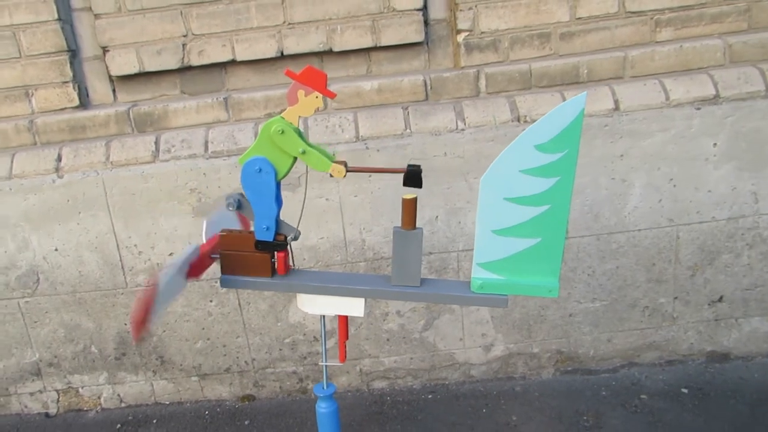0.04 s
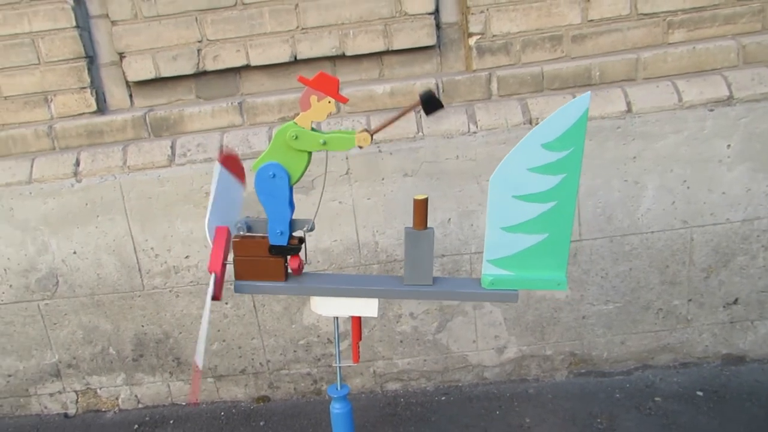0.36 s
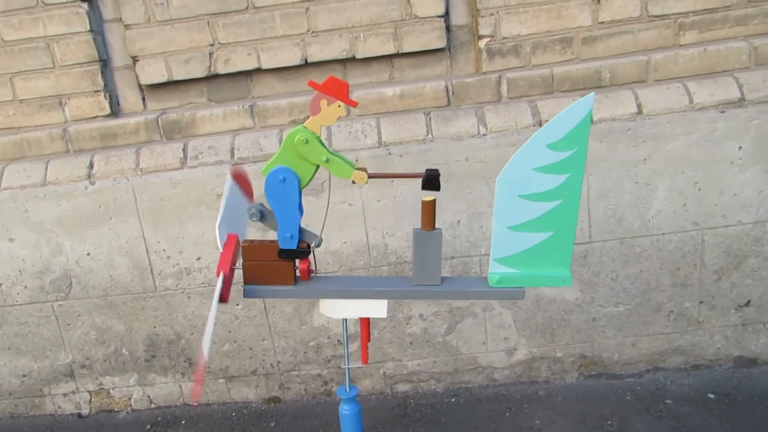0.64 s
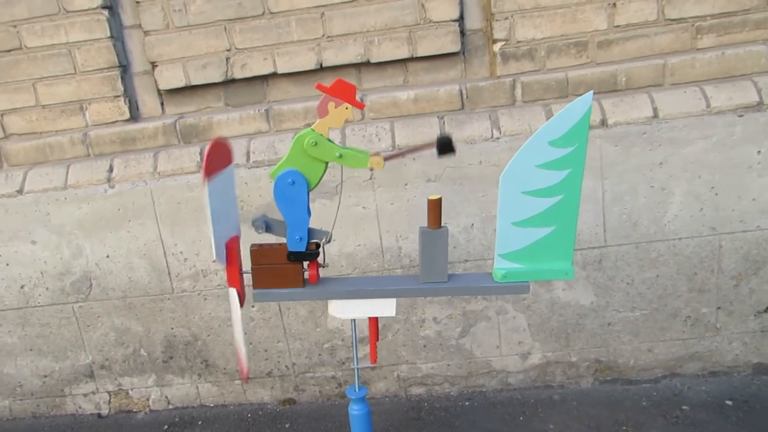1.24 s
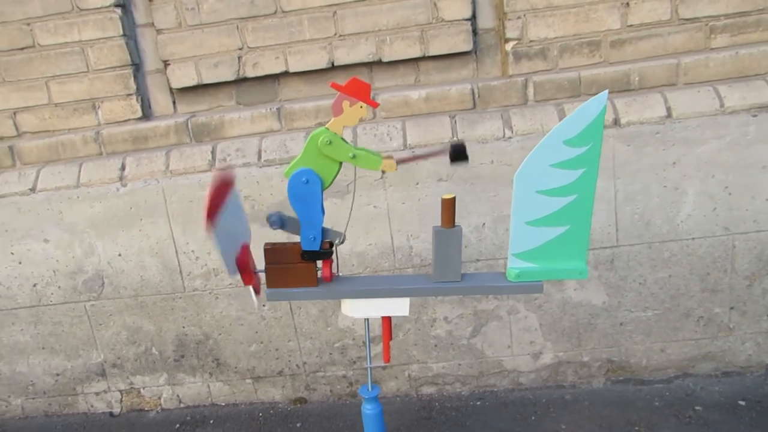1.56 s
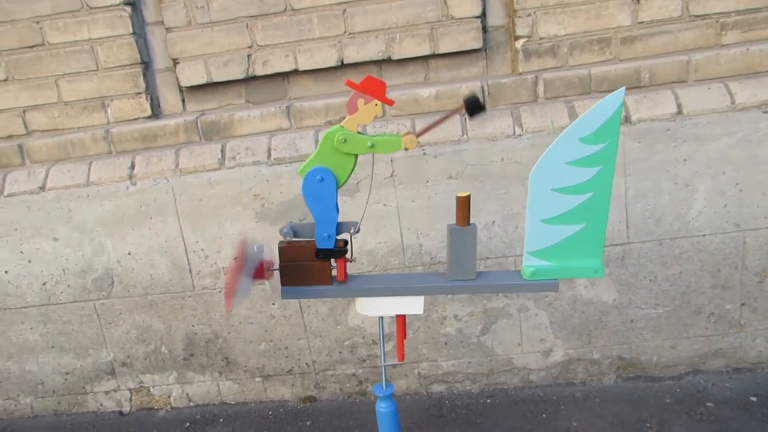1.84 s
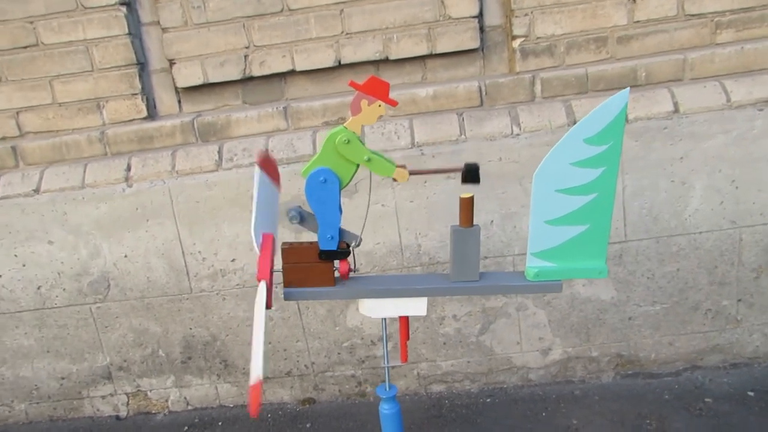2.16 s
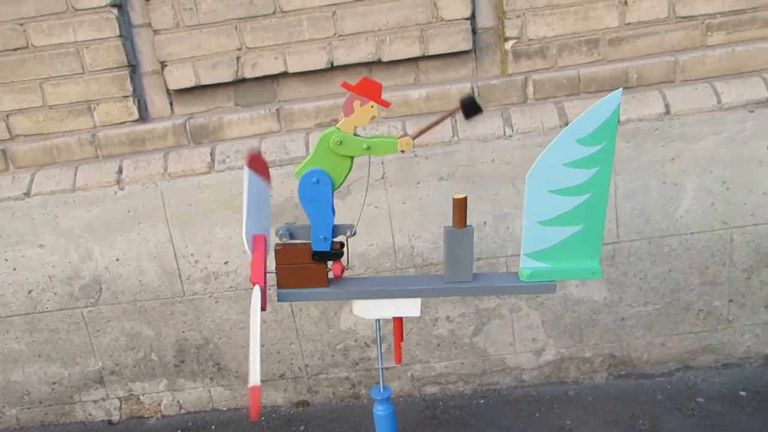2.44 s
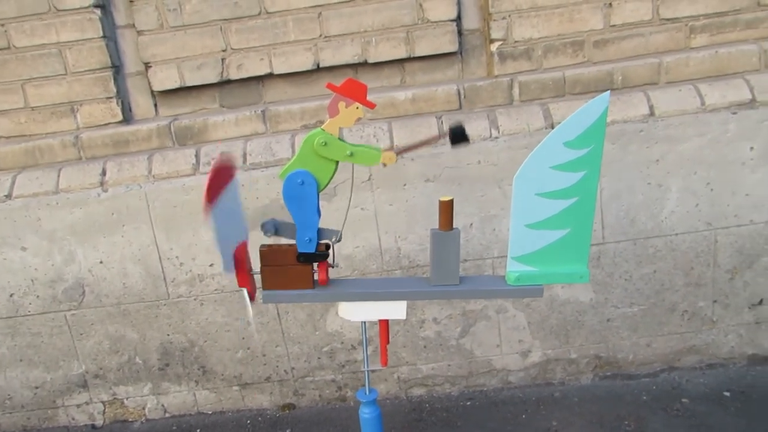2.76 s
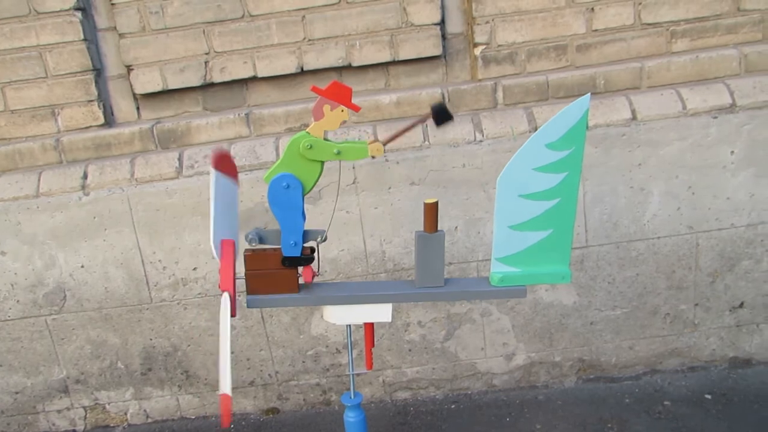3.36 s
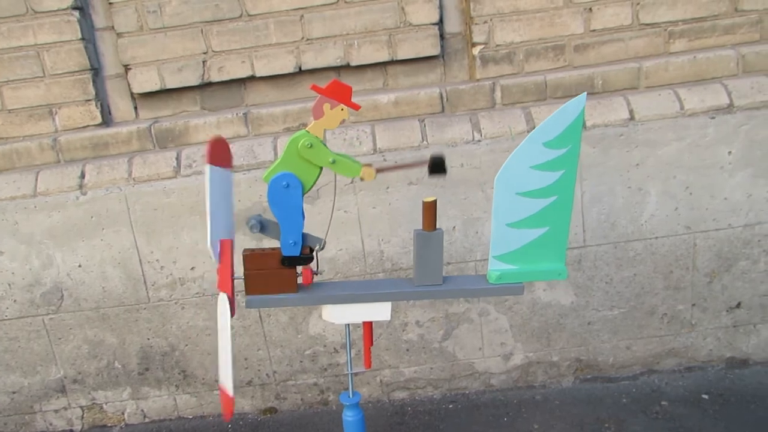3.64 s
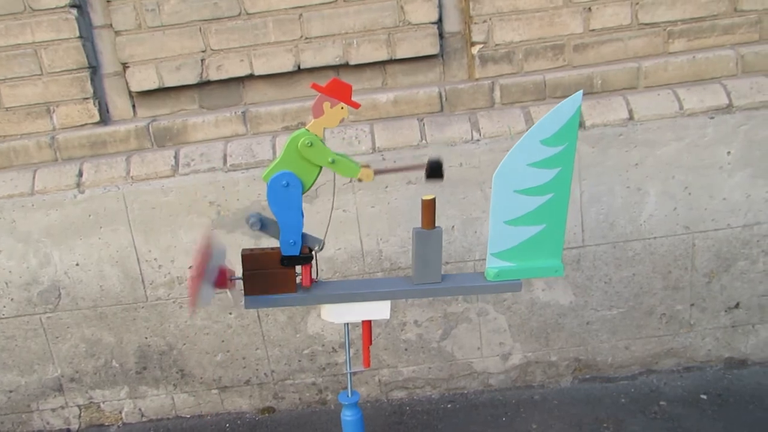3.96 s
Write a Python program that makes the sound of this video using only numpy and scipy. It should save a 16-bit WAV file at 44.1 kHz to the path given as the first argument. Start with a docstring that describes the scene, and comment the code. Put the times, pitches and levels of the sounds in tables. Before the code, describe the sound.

A wooden whirligig clicks and scrapes about twice a second, with a slight wire ring and one sharp clack early on. Gusts buffet the microphone throughout, over a soft street hush and faint distant birds.

```python
"""A wooden whirligig, a little woodcutter, turns in a gusty street. About twice a second its
crank lifts and drops the arm, and the loose linkage chatters and scrapes: wood rubs on wood,
and a wire and thin boards ring. One stroke lands with a sharp clack. Swirls of wind buffet
the microphone throughout, over the hush of the street. Small birds call far off, and a few
faint, thin high ticks are heard."""
import sys
import numpy as np
from scipy import signal
from scipy.fft import rfft, irfft
from scipy.io import wavfile
from scipy.ndimage import minimum_filter1d, map_coordinates

SR = 44100
rng = np.random.default_rng(int(sys.argv[2]) if len(sys.argv) > 2 else 0)


def dump(signal):
    """Clip the signal to [-1, 1] and save it as 16-bit WAV at the path in sys.argv[1]."""
    limited = np.clip(np.atleast_2d(signal).T, -1, 1)
    pcm = np.round(limited * 32767).astype(np.int16)
    wavfile.write(sys.argv[1], SR, pcm)


N = 176400
TIME = np.arange(N) / SR
FREQS = np.fft.rfftfreq(N, 1 / SR)

# short sounds, split below: t/s, relative level/dB, share that rings the wire (0-1)
SHORT_SOUNDS = [(.006, -57, 0.97), (0.028, -59, 1), (0.046, -63, 0.64), (0.3068, -43, 0.98),
                (0.3166, -48, 0.1), (0.316, -55, 0.3), (0.54, -64, 0.7), (0.556, -58, 0.7),
                (0.577, -58, 0.9), (.8425, -55, 0.95), (.8465, -60, .4), (0.873, -60, 0), (1.062, -64, 0.5),
                (1.077, -58.5, 0.9), (1.096, -64, 0.55), (1.116, -54, 0), (1.3714, -51.5, 0.15),
                (1.404, -54, 0), (1.578, -62.5, 1), (1.598, -59, 1), (1.624, -56.5, 0.05), (1.792, -67, 0),
                (1.871, -57.5, 0.53), (1.875, -52, 0.1), (1.9, -58.5, 0), (1.918, -60.5, 0.1),
                (2.088, -63.5, 1), (2.119, -61, 0), (2.274, -69, 0), (2.361, -56.5, 0.14),
                (2.368, -60.5, 0.23), (2.381, -62, 0.2), (2.605, -56, 0.04), (2.844, -61, 0.1),
                (2.854, -59, 0.3), (2.872, -60, 0.1), (2.91, -67, 0), (3.028, -64, 0.98),
                (3.045, -61, 0.95), (3.08, -64, 0.46), (3.315, -53, 1), (3.346, -58.5, 0.04),
                (3.392, -61, 0.67), (3.43, -73, 0), (3.502, -59.5, 0.73), (3.513, -63, 0.8),
                (3.532, -69, 0.7), (3.548, -63.5, 0.25), (3.769, -61.5, 0.09), (3.78, -62, 0),
                (3.8, -61.5, 0.12), (3.827, -69, 0), (3.843, -65, 0.16), (3.912, -74, 0),
                (3.957, -56.5, 0.7), (3.971, -65, 0.46)]
# faint, thin high ticks
FAINT_TICKS = [row for row in SHORT_SOUNDS if row[0] in (1.792, 2.274, 2.91, 3.43, 3.912)]
# knocks of the loose linkage
LINKAGE_KNOCKS = [row for row in SHORT_SOUNDS if row not in FAINT_TICKS]


def amp(db):
    """Turns decibels into a factor to multiply by."""
    return 10 ** (np.asarray(db) / 20)


def unit(x):
    """Scales a signal to an average power of 1."""
    return x / np.sqrt(np.mean(x ** 2) + 1e-20)


def add(mix, start, sound):
    """Adds a sound to the mix at a start time in seconds."""
    part = mix[..., max(round(start * SR), 0):][..., :sound.shape[-1]]
    part += sound[..., :part.shape[-1]]


def noise(spectrum, drive=None):
    """Gives white noise, or the drive signal, a tone colour from rows of f/Hz, level/dB."""
    hz, db = np.transpose(spectrum)
    gain = amp(np.interp(np.log(FREQS + 1), np.log(hz), db))
    return unit(irfft(rfft(rng.standard_normal(N) if drive is None else drive) * gain, N))


def stereo_noise(spectrum):
    """Separate noise for left and right, with the same tone colour."""
    return np.array([noise(spectrum), noise(spectrum)])


def wobble(hz):
    """A smooth random wiggle, up to about this fast."""
    return unit(irfft(rfft(rng.standard_normal(N)) * np.exp(-(FREQS / hz) ** 2), N))


def smooth(x, seconds):
    """A running average with bell-shaped weights."""
    bell = np.hanning(2 * round(seconds * SR / 2) + 1)
    return signal.fftconvolve(x, bell / bell.sum(), "same")


def wind():
    """Swirls of air sweep past the microphone's two openings, faster and harder in gusts."""
    # course of the wind: t/s, relative level/dB, brightness/dB
    gusts = [(0.0, -53, -17), (0.12, -57.5, -10), (0.29, -33, -25), (0.358, -29, -20), (0.468, -39.5, -23),
             (0.558, -30.5, -16), (0.599, -36, -17.5), (0.732, -31.5, -17), (0.78, -38, -21.5),
             (0.919, -47, -25), (1.0, -30.5, -12), (1.121, -35, -19), (1.161, -26, -5), (1.19, -39, -25.5),
             (1.238, -30.5, -8.5), (1.269, -35, -16.5), (1.35, -27.5, -10.5), (1.389, -39, -11),
             (1.428, -27, -17), (1.462, -30, -4.5), (1.49, -29, -17), (1.651, -35.5, -15), (1.68, -32, -7),
             (1.75, -38, -13), (1.77, -36.5, -21), (1.8, -30, -12), (1.93, -28, -9.5), (1.999, -38, -15.5),
             (2.051, -30, -15), (2.091, -46, -15), (2.138, -28.5, -13), (2.28, -34.5, -13),
             (2.371, -31, -19.5), (2.451, -42, -23), (2.471, -30, -11), (2.495, -35.5, -19),
             (2.531, -29, -14), (2.59, -36, -19), (2.841, -34.5, -14.5), (2.911, -41, -23.5),
             (2.94, -31, -12.5), (3.002, -38, -23), (3.15, -33, -11), (3.299, -39, -21.5), (3.338, -29, -8),
             (3.412, -32, -14), (3.43, -43.5, -16), (3.511, -33, -18.5), (3.822, -34, -13),
             (3.852, -41, -31), (3.89, -30.5, -12), (4.0, -34.5, -13.5)]
    # strongest single thumps of air: t/s, relative peak level/dB, f/Hz
    buffets = [(0.219, -8.5, 89), (0.291, 0.5, 111), (0.366, -0.5, 121), (0.546, -5, 206),
               (0.711, 4.5, 116), (1.006, 0, 164), (1.156, -7, 338), (1.236, -11, 288),
               (1.297, -9.5, 204.7), (1.354, -5, 318), (1.44, -4, 247), (1.459, -2, 333), (1.478, -18, 202),
               (1.55, -9, 277), (1.653, -8, 242), (1.677, -6, 253), (1.717, -11, 410), (1.783, -2.5, 144),
               (1.882, -1.5, 276), (1.899, -3, 360), (1.922, -7, 135), (1.964, -9, 357), (2.184, -5, 202),
               (2.215, -2.5, 261), (2.331, -1.5, 160), (2.474, -10.5, 356), (2.531, -9.5, 243),
               (2.733, -7, 173), (2.761, -3.5, 205), (2.93, 0, 120), (2.941, -10, 370), (3.092, -7, 313),
               (3.346, -4.5, 260), (3.367, 2.5, 192), (3.401, 2.5, 145), (3.578, -9, 272),
               (3.717, -3.5, 195), (3.876, -2.5, 186), (3.978, -4, 202)]
    # swirls that push left and right opposite ways: f/Hz, level/dB
    opposed_swirls = [(15, -58), (30, -11), (55, -2.5), (100, 3), (150, 0.5), (230, -7.5), (330, -17),
                      (480, -31.5), (700, -45.5), (1000, -66), (3000, -120)]
    # swirls that press on both openings alike: f/Hz, level/dB
    shared_swirls = [(15, -40), (55, 0.5), (150, 1.5), (330, -10), (480, -20.5), (700, -29.5),
                     (1000, -44.5), (3000, -120)]
    # low rumble that swells a little with the gusts: f/Hz, level/dB
    rumble = [(12, -21), (30, -19), (55, 16.5), (100, 6.5), (160, -1.5), (240, -25), (600, -85)]
    times, levels, brightness = np.transpose(gusts)
    gust_db = np.interp(TIME, times, levels)
    flutter = wobble(hz=86)
    speed = 2 ** (.025 * (np.interp(TIME, times, brightness) + 15) + .14 * flutter)
    force = amp(17 + gust_db + 1.3 * flutter)
    travel = [np.cumsum(speed)]  # reading the noise faster makes it brighter
    push = map_coordinates(noise(opposed_swirls), travel, order=3, mode="grid-wrap")
    press = map_coordinates(noise(shared_swirls), travel, order=3, mode="grid-wrap")
    push = force * unit(push / np.sqrt(smooth(push ** 2, seconds=.069)))  # force alone sets the level
    for at, db, hz in buffets:
        bell = np.exp(-.5 * ((TIME - at) * hz / .31) ** 2)  # about one cycle long
        thump = amp(db - 1) * np.cos(2 * np.pi * (hz * (TIME - at) + rng.random()))
        push = (1 - bell) * push + bell * thump
    push += amp(-25.5 + .3 * (gust_db + 33)) * noise(rumble)
    press *= amp(-19.5) * force
    return np.array([press + push, amp(-2.5) * (press - push)])


def street_hush():
    """The steady wash of the street, with a few faint swells of hiss."""
    # tone colour of the hush: f/Hz, level/dB
    colour = [(30, -6.5), (150, 12.5), (300, 5), (600, 3), (1000, 0), (1500, -2), (2400, -9), (3400, -10),
              (5000, -13.5), (7200, -17), (9000, -20), (11000, -20.5), (13000, -26), (15500, -33)]
    # its slow drift in loudness: t/s, level/dB
    loudness = [(0, -56), (.6, -58), (1.0, -59), (1.45, -59.5), (1.9, -61.5), (2.6, -59), (3.3, -61),
                (3.7, -61), (4, -63.5)]
    # swells of hiss: middle t/s, width/s, middle f/Hz, width/octaves, level/dB
    swells = [(2.935, 0.09, 1080, 0.69, -61), (3.14, 0.25, 664, 0.83, -55.5),
              (1.36, 0.26, 10800, 0.3, -75.5), (1.4, 0.33, 6500, 0.34, -74)]
    out = amp(np.interp(TIME, *np.transpose(loudness))) * stereo_noise(colour)
    for at, width, hz, octaves, db in swells:
        band = np.exp(-.5 * (np.log2((FREQS + 1) / hz) / octaves) ** 2)
        hiss = unit(irfft(rfft(rng.standard_normal((2, N))) * band, N))
        out += amp(db) * np.exp(-.5 * ((TIME - at) / width) ** 2) * hiss
    return out


def linkage_and_ticks():
    """Each knock is a gritty slip that rasps wood and rings the wire; the arm scrapes; ticks rasp too."""
    # ring of the wire link: f/Hz, level/dB
    wire = [(1000, -18), (3800, -26.5), (4700, -21), (5200, -3.5), (5500, 2), (5900, -19), (7000, -19),
            (10000, -34), (15000, -47)]
    # dry rasp, as of wood on wood: f/Hz, level/dB
    rasp = [(500, 4), (2400, 0), (3500, -9), (4700, -3), (6100, -3.5), (7200, -6), (8400, -3), (9500, -2.5),
            (10500, -9.5), (11500, -11), (13200, -12), (15000, -30)]
    # the arm slides on its pivot as it rises and drops: t/s, length/s, level/dB
    scrapes = [(0.296, 0.049, -64), (0.839, 0.055, -60.5), (1.35, .07, -65), (1.856, 0.075, -65),
               (2.086, 0.082, -63), (2.358, 0.061, -71.5), (2.83, 0.088, -61.5), (3.308, 0.11, -58.5),
               (3.506, 0.056, -72), (3.38, 0.037, -66), (3.757, 0.074, -61), (3.96, 0.06, -67.5)]
    rise_s, fall_s, tail_s, clicks_per_s, grit_share = .0014, .0049, .023, 500, .75
    wire_power, rasp_power, t = np.zeros(N), np.zeros(N), TIME[:SR // 8]
    shape = np.minimum(t / rise_s, 1) * (np.exp(-t / fall_s) + amp(-8) * np.exp(-t / tail_s))
    for start, db, wire_share in LINKAGE_KNOCKS + FAINT_TICKS:
        power = (amp(db + 2.5) * shape) ** 2
        add(wire_power, start, wire_share * power)
        add(rasp_power, start, (1 - wire_share) * power)
    for start, length, db in scrapes:
        progress = np.linspace(0, 1, round(length * SR))
        add(rasp_power, start, (amp(db) * np.sin(np.pi * np.sqrt(progress))) ** 2)
    roughness = amp(3 * wobble(hz=127))
    clicks = rng.random(N) < clicks_per_s / SR
    grit = clicks * amp(rng.uniform(-8, 8, N)) * rng.choice([-1, 1], (2, N))
    friction = np.sqrt(grit_share) * noise(rasp, grit) + np.sqrt(1 - grit_share) * stereo_noise(rasp)
    wire_ring = np.sqrt(wire_power) * stereo_noise(wire)
    return wire_ring + wooden_body(roughness * np.sqrt(rasp_power) * friction)


def wooden_body(x):
    """The toy's thin boards blur half of a sound's power into many short ringing tones."""
    t, fade_s = TIME[:SR // 20], .022
    ring = rng.standard_normal((2, len(t))) * amp(-60 * t / fade_s)
    ring /= np.linalg.norm(ring, axis=1, keepdims=True)
    return np.sqrt(.5) * (x + signal.fftconvolve(x, ring, axes=1)[:, :N])


def board_tones():
    """Each knock rings the boards a little differently; the faint ticks get the same high tones."""
    # tones of the thin boards: f/Hz, relative level/dB, time to fade by 60 dB/s
    boards = [(4800, -9, 0.051), (6040, -2, 0.051), (6740, -1, 0.028), (7300, -7, 0.017), (9170, -7, .03),
              (10170, -5, 0.033), (12800, -11, .015)]
    out, t = np.zeros((2, N)), TIME[:SR // 16]
    hz, tone_db, fade_s = np.transpose(boards)[:, :, None]
    for start, db, wire_share in SHORT_SOUNDS:
        colour, detune = rng.standard_normal((2, len(boards), 1))
        cycles = hz * (1 + .012 * detune) * t + rng.random((2, len(boards), 1)) / 2
        tones = amp(tone_db + 3.5 * colour - 60 * t / fade_s) * np.sin(2 * np.pi * cycles)
        add(out, start, amp(db - 1) * np.sqrt(1 - wire_share) * tones.sum(1))
    return out


def axe_clack():
    """A hard crack with one quick bounce; the frame clatters and the wooden block rings briefly."""
    # crack of the blow: f/Hz, level/dB
    crack_colour = [(500, -18), (1200, 6), (2300, 11), (3200, 12), (4100, -11), (5200, 11), (6200, -14),
                    (8500, 10), (10000, -18), (12600, 2), (15000, -28)]
    # short clatter of the frame: f/Hz, level/dB
    frame_colour = [(400, -14), (850, 2), (1300, -4), (2000, -5.5), (2600, 17.5), (3100, 0), (3700, 3),
                    (5500, -9), (8000, -14), (12000, -19)]
    # tones of the struck block: f/Hz, level/dB, time to fade by 60 dB/s
    block = [(884, -39, 0.04), (2180, -40, 0.011), (2690, -35.5, 0.028), (2890, -45.5, 0.049),
             (3740, -37, 0.016), (7530, -29.5, 0.0099)]
    strike_s, bounce_s, crack_fall_s, frame_fall_s = .5973, .0014, .0006, .0028
    out, t = np.zeros((2, N)), TIME[:SR // 10]
    bounce = amp(-11) * (t > bounce_s) * np.exp(-abs(t - bounce_s) / crack_fall_s)
    crack = amp(-23) * (np.exp(-t / crack_fall_s) + bounce) * stereo_noise(crack_colour)[:, :len(t)]
    clatter = amp(-30.5) * np.exp(-t / frame_fall_s) * stereo_noise(frame_colour)[:, :len(t)]
    lag_cycles = np.array([[0], [.22]])  # left, right
    ring = sum(amp(db - 60 * t / fade_s) * np.sin(2 * np.pi * (hz * t - lag_cycles))
               for hz, db, fade_s in block)
    add(out, strike_s, crack + clatter + ring)
    return out


def birds():
    """Thin arched whistles and rough chirps, blurred by distance."""
    # calls: t/s, length/s, f/Hz, arch/octaves, glide/octaves, level/dB, waver as a share of the pitch
    calls = [(0.77, 0.033, 5100, 0.02, -0.085, -70, 0.08), (0.778, 0.045, 4030, 0.02, -0.05, -66, 0.092),
             (0.79, 0.12, 3130, -0.052, -0.07, -67.5, 0.085), (.93, 0.13, 3110, 0.042, .05, -72.5, 0.096),
             (1.196, 0.13, 9730, 0.078, 0.063, -76, 0.018), (1.43, 0.13, 10600, -0.019, -0.16, -79, 0.014),
             (2.383, 0.14, 4276, 0.056, 0.13, -64.5, 0.023), (2.46, 0.25, 4570, 0.092, -0.06, -69.5, 0.085),
             (2.602, 0.095, 3100, 0.09, -0.032, -69, 0.13), (2.719, 0.15, 4312, 0.046, -0.078, -62, .026),
             (3.416, 0.082, 2986, 0.046, 0.0014, -74.5, 0.043)]
    song, waver = np.zeros(N), wobble(hz=429)
    for start, length, hz, arch, glide, db, rough in calls:
        progress = np.clip((TIME - start) / length, 0, 1)
        arc = np.sin(np.pi * progress)
        pitch = hz * 2 ** (arch * arc + glide * (progress - .5)) * (1 + rough * waver)
        phase = 2 * np.pi * np.cumsum(pitch) / SR
        song += amp(db) * np.sqrt(2) * arc * (np.sin(phase) + amp(-24) * np.sin(2 * phase))
    return song + 1.45 * street_echo(song)


def street_echo(x):
    """Sound bounces between the walls and blends into a fading tail."""
    t, fade_s = TIME[:SR], .46
    tail = rng.standard_normal((2, SR)) * amp(-60 * t / fade_s)
    return signal.fftconvolve(x[None], tail / np.linalg.norm(tail[0]), axes=1)[:, :N]


def scene():
    """The whirligig in its street, under the wind."""
    return wind() + linkage_and_ticks() + board_tones() + axe_clack() + birds() + street_hush()


def record(dry):
    """The recorder notches out two narrow pitches; a limiter tames the hardest buffets; the top treble is cut."""
    ceiling, limiter_s, cutoff_hz = .93, .012, 15600
    for hz, sharpness in [(3950, 14.7), (7900, 77)]:
        dry = signal.lfilter(*signal.iirnotch(hz, sharpness, SR), dry)
    safe_gain = ceiling / np.maximum(abs(dry).max(0), ceiling)
    reduction = smooth(1 - minimum_filter1d(safe_gain, round(limiter_s * SR)), limiter_s)
    lowpass = signal.firwin(511, cutoff_hz, window=("kaiser", 9), fs=SR)
    return signal.oaconvolve(dry * (1 - reduction), lowpass[None], "same")


dry = scene()
out = record(dry)
dump(out)
```